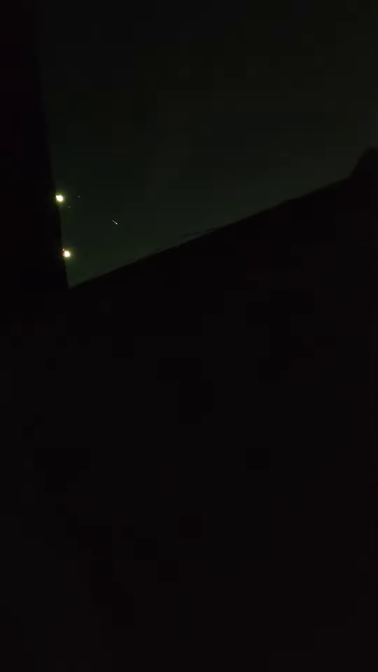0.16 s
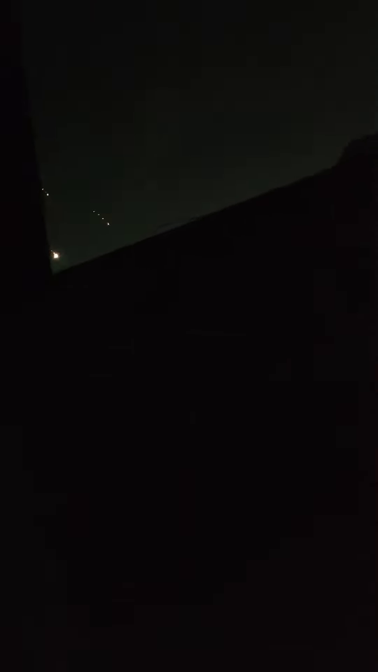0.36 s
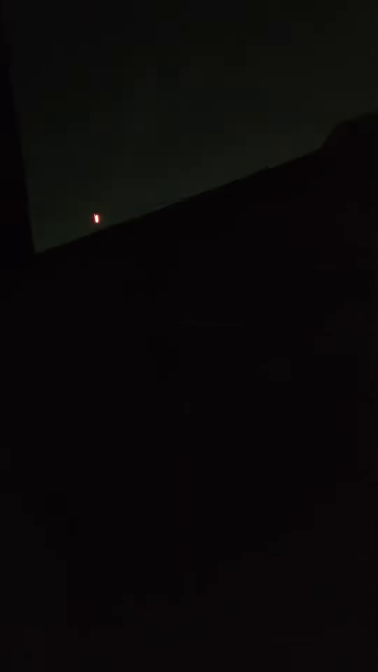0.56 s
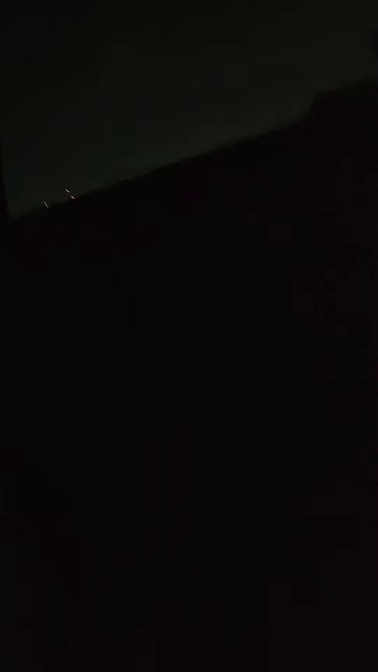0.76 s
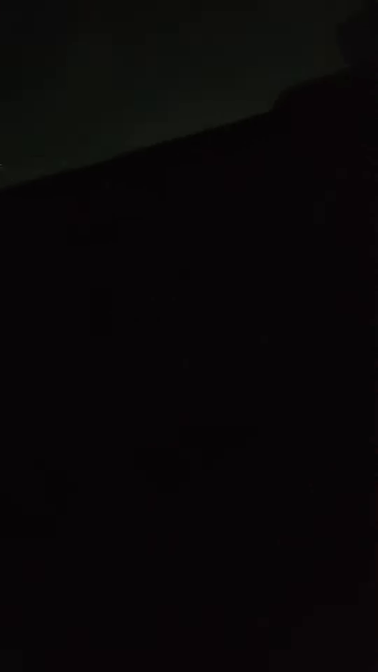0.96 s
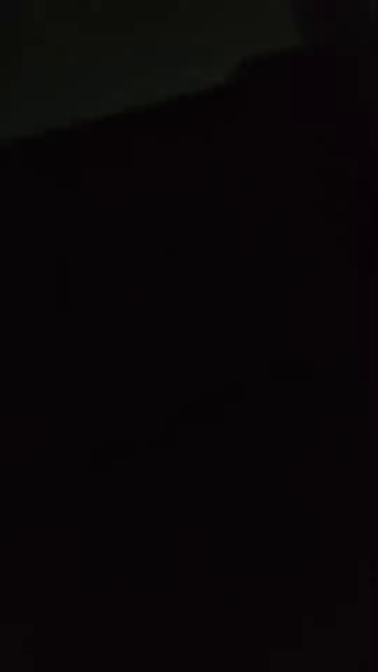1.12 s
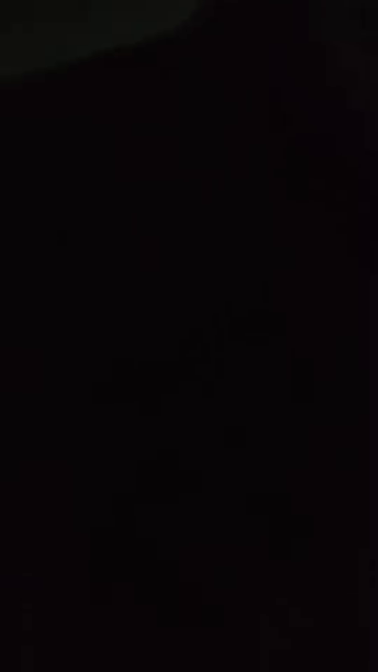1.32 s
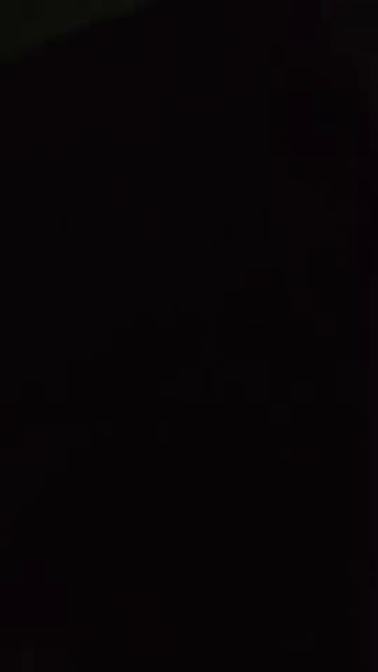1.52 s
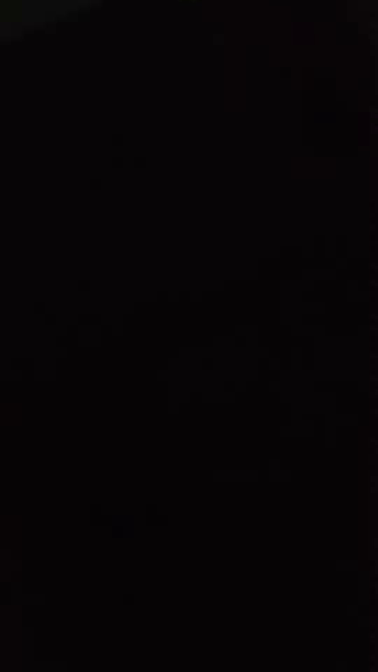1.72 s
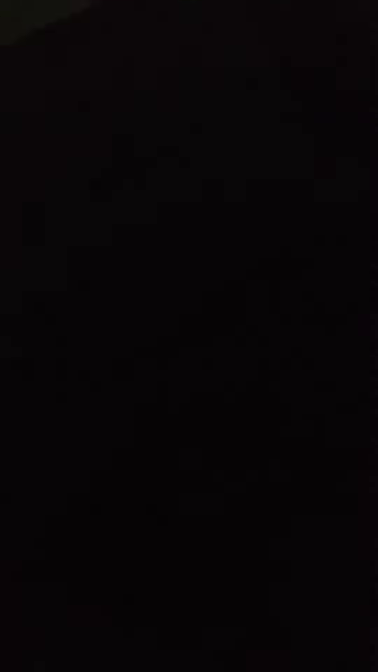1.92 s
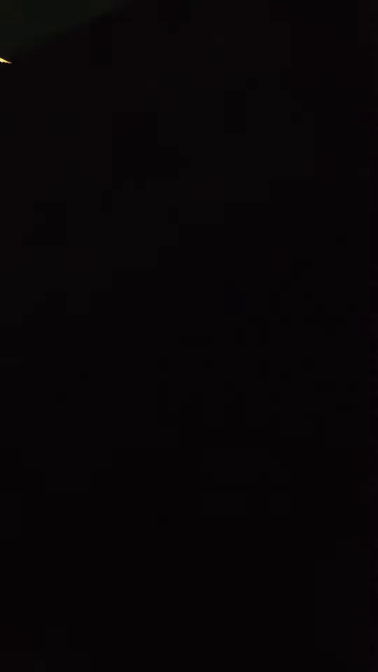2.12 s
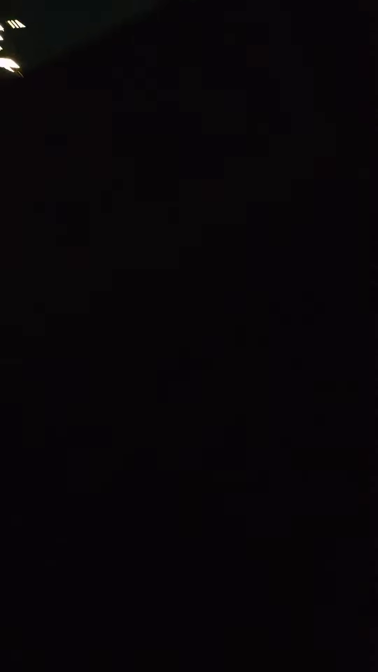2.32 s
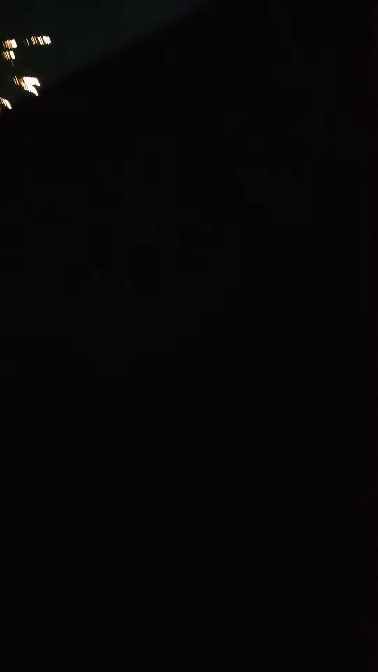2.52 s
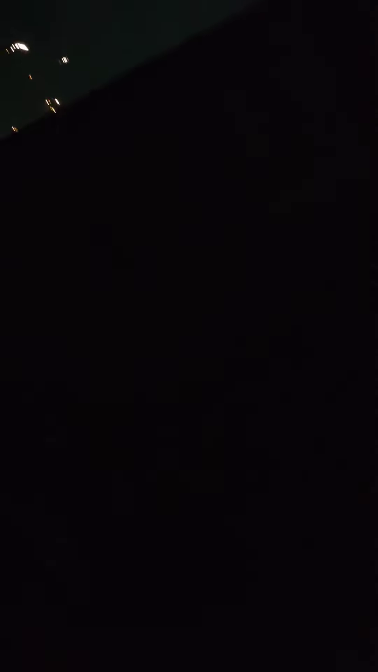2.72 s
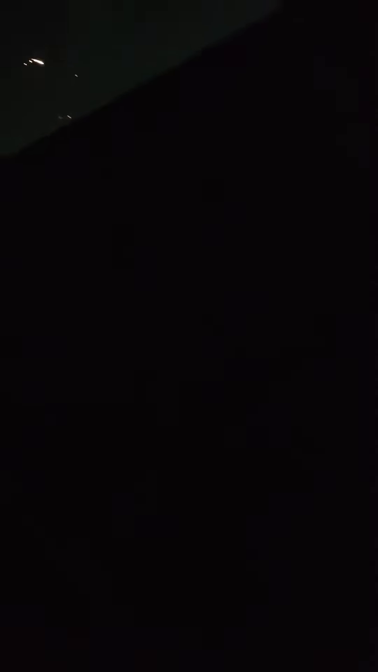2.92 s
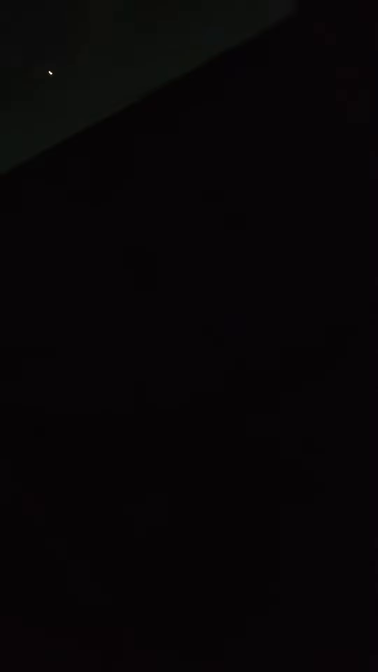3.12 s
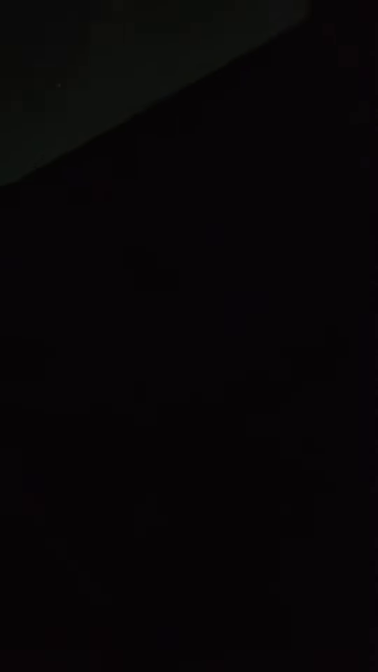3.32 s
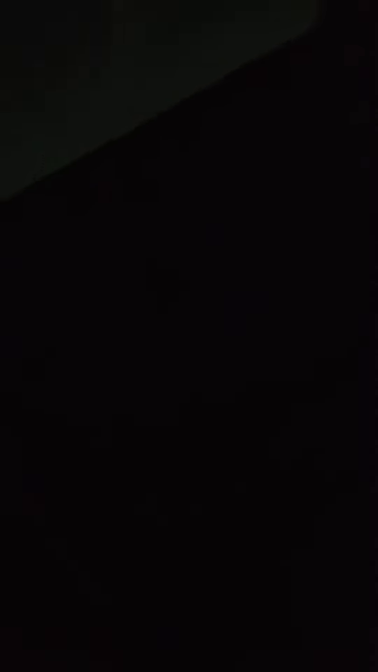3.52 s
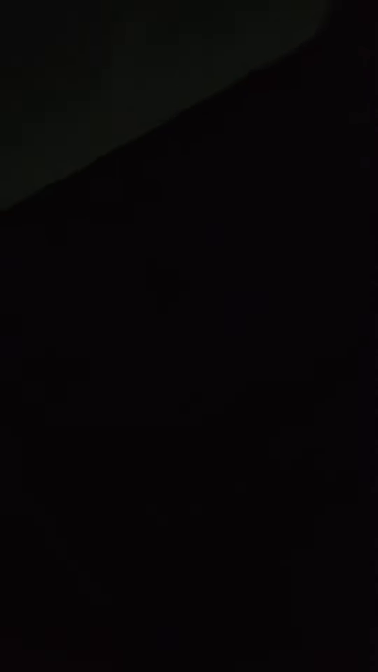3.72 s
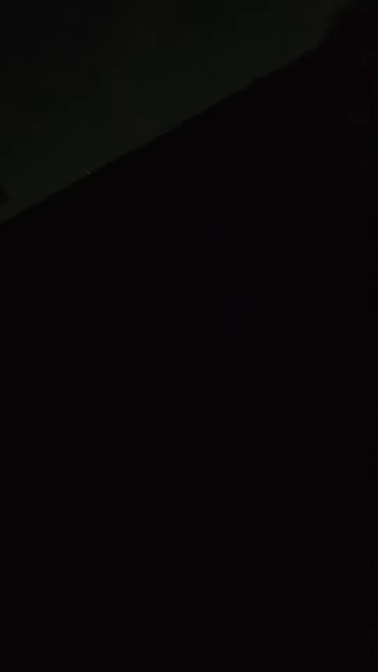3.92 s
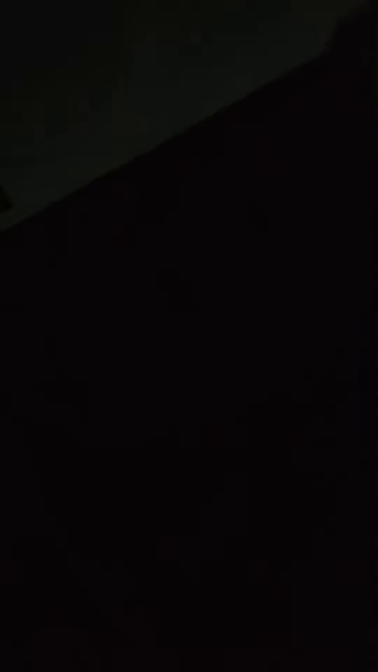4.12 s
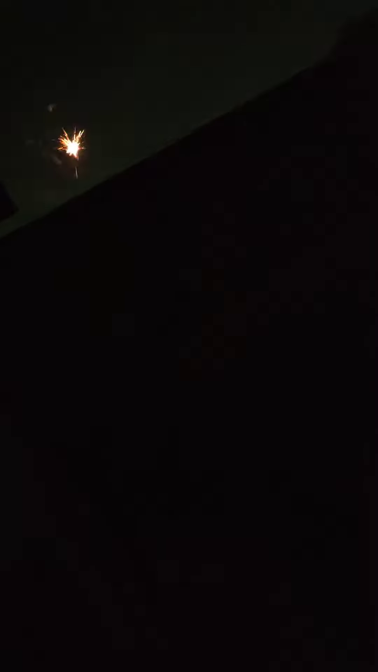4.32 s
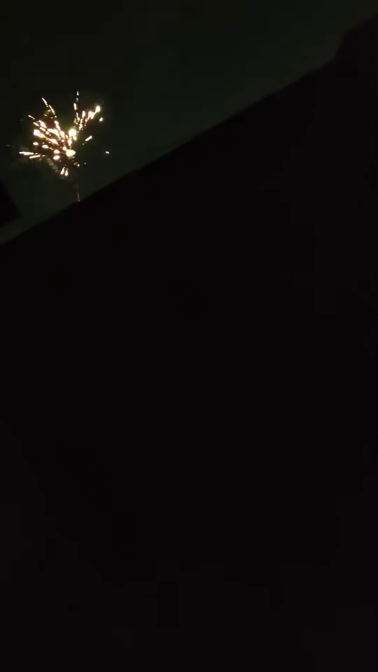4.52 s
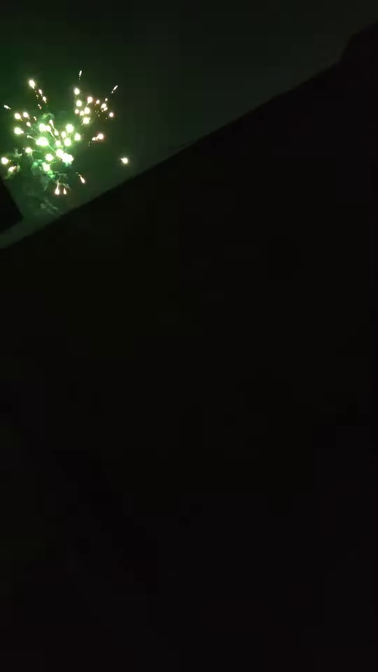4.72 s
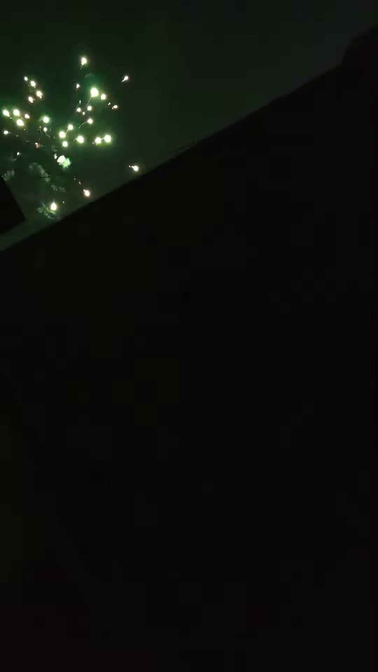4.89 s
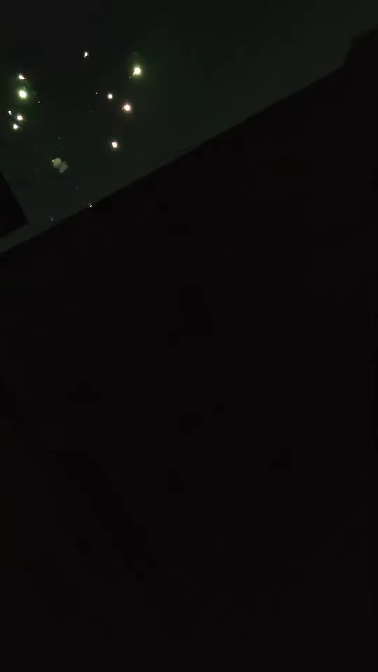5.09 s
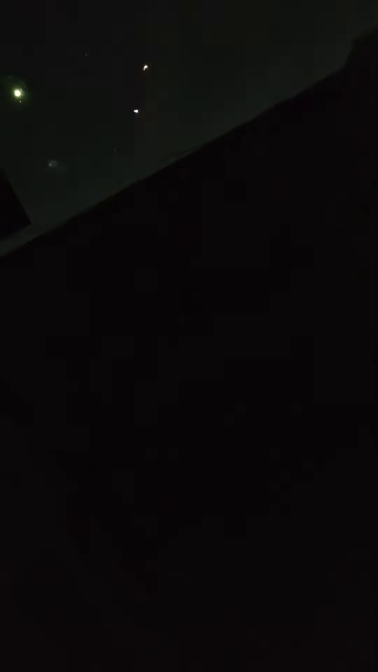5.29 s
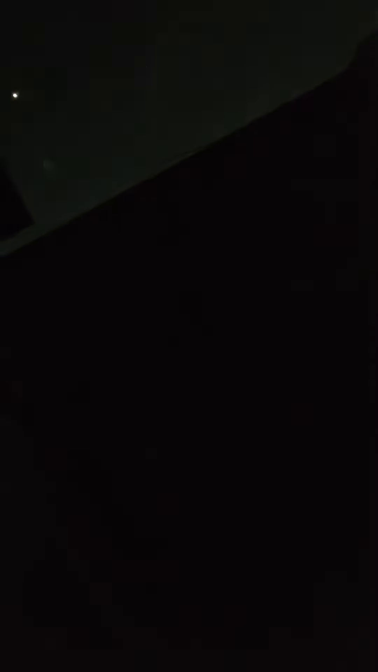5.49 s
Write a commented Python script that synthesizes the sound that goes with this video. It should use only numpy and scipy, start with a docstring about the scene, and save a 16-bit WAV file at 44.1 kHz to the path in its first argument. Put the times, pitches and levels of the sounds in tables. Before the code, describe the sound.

Night in a built-up street, heard on a handheld stereo phone. The rolling echo of an earlier firework is fading at the start, over dull far traffic and a faint wavering hum near 65 Hz. A muffled distant launch thud with quick echoes comes at 0.26 s; tiny case ticks, hissy finger rustle and a low bump at 1.1 s, mostly left, continue until 1.5 s. Faint crackles come at 1.6-1.7 s. At 1.94 s a huge, sharp bang overloads the input, a ragged train of slaps packed into the first quarter second, sparser echoes to 0.7 s, then a darkening roll. Far rumble swells around 3.2-3.5 s with small knocks from 3.1 to 3.4 s and a thud at 3.5 s. Faint ticking pops precede a second equally violent bang at 4.51 s, with the same clattering wall slaps and dulling tail. A last distant thud lands at 5.38 s.

```python
"""Aerial firecrackers in a street at night

Two firecrackers burst over a built-up street, heard by a hand-held phone with two microphones.
Each blast is a train of sharp noise bursts slapped back by walls; band noise rolls away ever duller after it.
Far launch thuds and crackles are smaller bursts of the same kind; rustle, ticks and a bump come from the hand.
Shaped noise and a wavering hum form the town beneath, and the loudest peaks overload the input."""
import sys
import numpy as np
from scipy import signal
from scipy.fft import rfft, irfft
from scipy.io import wavfile
from scipy.ndimage import uniform_filter1d

SR = 44100
rng = np.random.default_rng(int(sys.argv[2]) if len(sys.argv) > 2 else 0)


def bounce(signal):
    """Save signal as a 16-bit WAV file at the path given by the first command-line argument."""
    frames = np.transpose(np.atleast_2d(signal))
    limited = np.clip(frames, -1, 1)
    pcm = np.round(limited * 32767).astype(np.int16)
    wavfile.write(sys.argv[1], SR, pcm)


N = 244755
T = np.arange(N) / SR  # s
LEFT_LAG_S = 0.00032712  # later arrival at the left microphone
# Burst times, one column: start_s; the first burst is still dying away at the start
BURSTS_S = [-.67, 1.9365, 4.513]


def amp(db):
    """Level: 20 dB is a factor of ten in amplitude."""
    return 10 ** (np.asarray(db) / 20)


def on_hz(table, hz):
    """Logarithmic frequency scale: interpolate a table of frequency and value."""
    table_hz, values = np.transpose(table)
    return np.interp(np.log(np.maximum(hz, 1)), np.log(np.maximum(table_hz, 1)), values)


def air(hz):
    """Atmospheric absorption: it rises with frequency, here relative to the loss at 4 kHz."""
    return (hz / 4000) ** 1.0777


def stereo(pan_db):
    """Level difference: split left minus right dB evenly between the two channels."""
    return np.array([[pan_db], [-pan_db]]) / 2


def walk(rate_hz):
    """Random modulation: noise drawn at a slow rate and smoothed, with a spread of 1."""
    hold = int(SR / rate_hz)
    steps = np.repeat(rng.standard_normal(N // hold + 1), hold)
    smooth = uniform_filter1d(steps, hold)[:N]
    return smooth / smooth.std()


def swells(table):
    """Exponential growth and decay: summed power of events whose dB level climbs and sinks steadily."""
    power = 0
    for peak_s, level_db, rise_s, fall_s in table:
        drop_db = 20 * np.maximum((peak_s - T) / rise_s, (T - peak_s) / fall_s)
        power = power + amp(level_db - drop_db) ** 2
    return power


def pair(count, direct=0.):
    """Spatial coherence: noise spectra alike in the bass, less so in the treble, later on the left."""
    # Likeness of scattered sound at the two microphones: frequency_hz, correlation
    likeness = [(60, 0.921), (300, 1), (640, 0.6571), (1400, 0.1467), (3000, 0.1676), (10000, 0.0502)]
    # Extra brightness of the right port: frequency_hz, gain_db
    right_lift = [(3000, -0.5), (8000, 2.5), (14000, 3)]
    hz = np.arange(count // 2 + 1) * SR / count
    mid, side = rfft(rng.standard_normal((2, count)))
    # direct sets a floor under the correlation
    coherence = np.clip(np.maximum(on_hz(likeness, hz), direct), 0, 1)
    signs = np.array([[1], [-1]])
    both = np.sqrt(1 + coherence) * mid + np.sqrt(1 - coherence) * side * signs
    left_delay = np.exp(-2j * np.pi * hz * LEFT_LAG_S)
    return hz, both * np.array([left_delay, amp(on_hz(right_lift, hz))])


def arrivals(rows, direct=0.3324, rise_s=.0001, crack_share=0.8939, lift_db=3, split_hz=3000,
             hold=1.3958, blur_s_per_db=0.0552, front=1.101, size=4096):
    """Impulsive reflection: each arrival is a ragged noise burst and a ring, first at the right microphone."""
    # Spectrum of a blast: frequency_hz, relative_level_db_per_hz
    blast = [(18, -37.5), (30, -17.5), (125, -4.5), (196, -5), (608, -0.5), (1180, -8), (1450, -10),
             (1890, -12), (2050, -14), (4410, -20.5), (5740, -27), (15200, -34), (16500, -59)]
    out = np.zeros((2, N + size))
    t = np.maximum(np.arange(size) / SR - np.array([[LEFT_LAG_S], [0]]), 0)
    for start_s, level_db, pan_db, loss_db, t60_s, ring_hz, ring_db in rows:
        hz, noise = pair(size, direct)
        # more air loss means a more blurred front
        rise = 1 - np.exp(-t / (rise_s + blur_s_per_db * max(loss_db, 0)))
        noise = rise * irfft(noise) * (1 + front * np.exp(-t / 0.00199))
        # the level holds a moment, then falls away; the treble crack dies sooner than the body
        slow = amp(-60 * (t / max(t60_s, .004)) ** hold)
        quick = amp(-60 * (t / max(crack_share * t60_s, .004)) ** hold)
        lift = np.exp(-(2 * np.log2(np.maximum(hz, 1) / ring_hz)) ** 2)
        gain_db = on_hz(blast, hz) - loss_db * air(hz) + lift_db * lift
        # minimum-phase colour by folding the cepstrum keeps the front sharp
        cepstrum = irfft(gain_db * np.log(10) / 20)
        cepstrum[1:size // 2] *= 2
        cepstrum[size // 2 + 1:] = 0
        colour = np.exp(rfft(cepstrum))
        bass = 1 / (1 + (hz / split_hz) ** 2)
        body = bass * rfft(noise * slow)
        crack = (1 - bass) * rfft(noise * quick)
        wave = irfft((body + crack) * colour)
        # the first 400 samples get an RMS of one half
        wave = wave / np.sqrt(np.mean(wave[:, :400] ** 2)) / 2
        # evenly spaced ledges and recesses turn the shock into a few cycles of one pitch
        wave = wave + amp(ring_db) * rise * slow * np.sin(2 * np.pi * ring_hz * t)
        i = int(start_s * SR)
        out[:, i:i + size] += wave * amp(level_db + stereo(pan_db))
    return out[:, :N]


def slaps():
    """Specular reflection: bursts meet the same walls, and each slap carries a short low swing of air."""
    # The shock and the walls that slap it back, equal in delay but not in strength for the two bursts:
    # delay_s, second_burst_level_db, third_burst_level_db, left_minus_right_db, air_loss_at_4_khz_db,
    # ring_hz, ring_against_burst_db
    walls = [(0, -0.5, 2, 2.5, -.5, 342.8, -3.5), (.0162, -1, -3, -.5, 1.5, 382, -1),
             (.031, -15.5, -7.5, 3, 1, 424, -3.5), (.0562, 3.5, 1.5, 5.5, -2, 650.8, -6),
             (.075, -6.5, -5, 3, 0, 269, -2), (0.1154, -10, -4, 2.5, 1.5, 550.5, -4.5),
             (.134, -18.5, -12, -1, 4, 520.4, 1), (.1765, -13, -13, -4.5, 4, 507.5, -4.5),
             (.209, -12.5, -23, -4.5, 4, 646.9, -7), (.238, -16.5, -10.5, -1.5, 3.5, 507.7, -3),
             (.33, -17, -25, -1, 7, 310, 1), (.444, -16.5, -16.5, 1, 5.5, 520.8, -1.5),
             (.526, -17, -18.5, 0.5, 5, 495, -6), (.649, -17.5, -16.5, -.5, 5.5, 520, -6),
             (.694, -23.5, -19, 2, 3.5, 589.6, -4.5)]
    t60_s = 0.04129
    boom_db, boom_hz, boom_t60_s = -18, 65, .06  # level is against the slap
    rows = []
    for k in (1, 2):
        for wall in walls:
            rows.append((BURSTS_S[k] + wall[0], wall[k], *wall[3:5], t60_s, *wall[5:]))
    boom = 0
    for start_s, level_db, *_ in rows:
        age = np.maximum(T - start_s, 0)
        decay = amp(level_db + boom_db - 60 * age / boom_t60_s)
        boom = boom + decay * np.sin(2 * np.pi * boom_hz * age)
    return arrivals(rows) - boom


def rolls(lumpy_db=.8, patchy_db=.8):
    """Late reverberation: echoes of countless far walls lose treble with path length and come in lumps."""
    # Spectrum of the young echo: frequency_hz, relative_level_db_per_hz
    echo = [(30, -27), (60, -11), (110, -5.5), (200, -6), (320, 0), (500, -1), (750, -3.5), (1100, -8.5),
            (1600, -11.5), (2500, -15.5), (4400, -21.5), (8000, -30), (16500, -36)]
    # Decay of the rolling echo of a burst: age_s, level_db
    decay = [(0, -17), (.045, -17.5), (.08, -15.5), (.16, -21), (.25, -18.5), (.4, -22.5), (.67, -23),
             (.8, -29), (1.1, -35.5), (1.7, -44), (2.2, -52), (3, -60)]
    # Gain of each burst's rolling echo, one column: gain_db
    burst_gains = [-8.5, 0, -.8]
    # Far rumble that swells and sinks: peak_s, level_db, rise_s_per_20_db, fall_s_per_20_db
    rumbles = [(.3, -37, 0.0068, .6), (3.16, -38, 0.3951, 0.2683), (3.53, -34, 0.2124, .3),
               (4.3, -46, 0.1024, 0.5774)]
    # Air loss at 4 kHz against age, one row: first_db, last_db, time_constant_s
    first_db, last_db, time_s = (0.3037, 9.7303, 0.679)
    hz, noise = pair(N)
    noise = noise * amp(on_hz(echo, hz))
    noise = noise / np.sqrt(np.mean(irfft(noise, N) ** 2))
    power = swells(rumbles)
    for start_s, gain_db in zip(BURSTS_S, burst_gains):
        power = power + (T > start_s) * amp(gain_db + np.interp(T - start_s, *np.transpose(decay))) ** 2
    level_db = 10 * np.log10(power)
    # the latest burst sets the age
    starts = np.array(BURSTS_S)
    age = T - starts[np.searchsorted(starts, T) - 1]
    loss_db = last_db + (first_db - last_db) * np.exp(-age / time_s)
    lumps, out = lumpy_db * walk(45), 0
    for centre_hz in 30 * 2 ** np.arange(0, 9.5, .5):  # half-octave bands
        octaves = np.log2(np.maximum(hz, 1) / centre_hz)
        mask = np.cos(np.pi * np.clip(octaves, -.5, .5)) ** 2
        band_db = level_db - loss_db * air(centre_hz) + lumps + patchy_db * walk(22)
        out = out + irfft(noise * mask, N) * amp(band_db)
    return out


def thuds():
    """Discrete echoes: every far launch thud is followed by the same few delayed copies of its pattern."""
    # Launch thuds: start_s, level_db, ring_hz
    launches = [(.258, -27.5, 350.7), (3.492, -25.5, 307.6), (5.382, -23, 299.7)]
    # Echoes of a thud: delay_s, gain_db, left_minus_right_db, pitch_ratio
    echoes = [(0, 0, 0, 1.007), (.037, -3, -1.5, 1.131), (.088, -7, -2, 1.0968), (.12, -10, -1, 1.3),
              (.18, -13, -2, .98)]
    loss_db, t60_s, ring_db = 9, .05, 3
    rows = []
    for start_s, level_db, hz in launches:
        for late_s, echo_db, pan_db, ratio in echoes:
            if start_s + late_s < N / SR:
                rows.append((start_s + late_s, level_db + echo_db, pan_db, loss_db, t60_s, hz * ratio, ring_db))
    return arrivals(rows, direct=0.5495, rise_s=0.001258, crack_share=0.62, lift_db=12.0)


def pops():
    """Impulsive excitation: small far crackles and knocks are short noise bursts with a faint ring."""
    # Crackles and knocks: start_s, level_db, left_minus_right_db, ring_hz
    crackles = [(0.478, -36, 1, 1900), (1.589, -41.5, 3, 845.4), (1.631, -40, 0.5, 2500),
                (1.645, -36, 0, 1220), (1.72, -43, -1.5, 1108), (3.127, -35, 1.5, 974),
                (3.299, -26, 1.5, 803), (3.375, -30, 0.5, 808.6), (3.425, -31.5, 1, 914.4),
                (4.277, -40, -1, 811), (4.292, -37.5, 2, 797.5), (4.375, -43, -1.5, 809),
                (4.46, -41.5, 0, 1128)]
    loss_db, t60_s, ring_db = 5, .036, -8
    rows = [(start_s, level_db, pan_db, loss_db, t60_s, hz, ring_db)
            for start_s, level_db, pan_db, hz in crackles]
    return arrivals(rows, direct=0.207, rise_s=0.000499, crack_share=0.836, lift_db=10)


def hand():
    """Friction and contact: sliding skin hisses, the case ticks, and a bump stirs the left microphone."""
    # Strokes of skin and cloth on the case: peak_s, level_db, rise_s_per_20_db, fall_s_per_20_db (0 cuts off)
    strokes = [(.25, -63, .35, 0.498), (.816, -65.5, 0.1518, 0), (1.078, -56.5, 0.2343, 0.0546),
               (1.19, -62, 0.0844, 0.359), (1.346, -50, 0.2151, 0.1885), (1.456, -55.5, 0.0365, 0.1028)]
    # Ticks of the case: start_s, level_db, left_minus_right_db
    ticks = [(0.0608, -58, -2.0), (0.1999, -43, 3), (0.2433, -45, 5), (0.2839, -43, 2), (0.3377, -44, 2.5),
             (1.144, -41, 2.5), (1.436, -34, -6), (1.4546, -40, 7)]
    tick_hz = 9000
    bump_s, bump_hz, bump_db, bump_width_s = 1.135, 87.53, -19.5, 0.006105
    highpass = signal.butter(2, 5800, "high", fs=SR, output="sos")
    hiss = signal.sosfilt(highpass, rng.standard_normal((2, N)))
    out = hiss / hiss.std() * np.sqrt(swells(strokes)) * amp(1.103 * walk(66.017))
    t = np.arange(200) / SR
    for start_s, level_db, pan_db in ticks:
        click = np.sin(2 * np.pi * tick_hz * t) * np.exp(-t / .0001)
        scrape = 0.5394 * rng.standard_normal(200) * np.exp(-t / 0.001355)
        i = int(start_s * SR)
        out[:, i:i + 200] += (click + scrape) * amp(level_db + stereo(pan_db))
    age = T - bump_s
    bump = np.cos(2 * np.pi * bump_hz * age) * np.exp(-(age / bump_width_s) ** 2)
    out[0] -= amp(bump_db) * bump
    return out


def town():
    """Broadband and tonal noise: far traffic, a fading wash and a frequency-modulated low hum."""
    # Spectrum of the traffic: frequency_hz, relative_level_db_per_hz
    traffic_spectrum = [(25, -39.5), (50, 1), (120, -3), (320, -7), (600, -16), (1000, -16.5),
                        (2000, -22.5), (4000, -33), (8000, -48.5), (16000, -58.5)]
    # Fading wash of noise: time_s, level_db
    wash_levels = [(0, -43.5), (.5, -52.5), (1, -55.5), (1.45, -61.5), (1.6, -77)]
    # Track of the hum: time_s, pitch_hz, level_db
    hum_track = [(0, 64.8, -44.5), (1.7, 64.2, -45.5), (2.6, 64.97, -43.5), (3, 65.04, -47),
                 (4.2, 66.11, -48.5), (5.55, 63.7, -46.5)]
    traffic_db, wash_hz, wash_width_hz = -45, 1209.4, 380.8
    hz, noise = pair(N)
    traffic = irfft(noise * amp(on_hz(traffic_spectrum, hz)), N)
    wash_band = np.exp(-((hz - wash_hz) / wash_width_hz) ** 2)
    wash = irfft(rfft(rng.standard_normal((2, N))) * wash_band, N)
    wash_db = np.interp(T, *np.transpose(wash_levels), right=-120)
    wash = wash / wash.std() * amp(wash_db + stereo(2.4))
    time_s, pitch_hz, level_db = np.transpose(hum_track)
    wavering_hz = np.interp(T, time_s, pitch_hz) + 1.2 * walk(6)
    phase = 2 * np.pi * np.cumsum(wavering_hz) / SR
    hum_db = np.interp(T, time_s, level_db) + 1.356 * walk(25)
    hum = np.sqrt(2) * np.sin(phase) * amp(hum_db + stereo(1.4))
    return traffic / traffic.std() * amp(traffic_db) + wash + hum


def scene():
    """Superposition: the pressures of all sources add at the two microphones."""
    return slaps() + thuds() + pops() + rolls() + town() + hand()


def record(dry):
    """Saturation: the input hisses and rounds off peaks; the right capsule jams, jumps and creeps back."""
    # Right capsule knocked against its stop: start_s, stuck_s, offset (amplitude),
    # recovery_time_constant_s, lift_off_pressure (amplitude)
    jams = [(1.937, .051, -.95, .0022, .45), (4.513, .0015, -.6, .001, .3)]
    drive_db, ceiling, self_noise_db, top_hz = 1.5, 0.86, -72, 16000
    left, right = amp(drive_db) * dry
    jump = 0
    for start_s, stuck_s, offset, recovery_s, lift_off in jams:
        age = T - start_s
        # while stuck, only strong pushes in one direction move the membrane
        right = np.where((age > 0) & (age < stuck_s), np.maximum(right - lift_off, 0), right)
        jump = jump + (age > 0) * offset * np.exp(-np.abs(age) / recovery_s)
    left, right = ceiling * np.tanh(np.array([left, right]) / ceiling)
    wet = np.array([left, np.maximum(right + jump, -ceiling)])
    wet = wet + amp(self_noise_db) * rng.standard_normal((2, N))
    wet = signal.sosfilt(signal.butter(1, 30., "high", fs=SR, output="sos"), wet)
    return signal.sosfilt(signal.ellip(10, .2, 100, top_hz, fs=SR, output="sos"), wet)


dry = scene()
out = record(dry)
bounce(out)
```